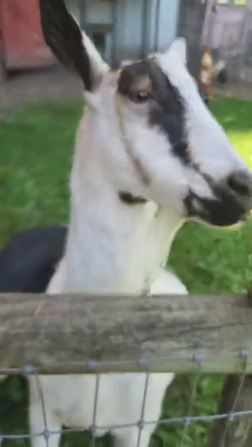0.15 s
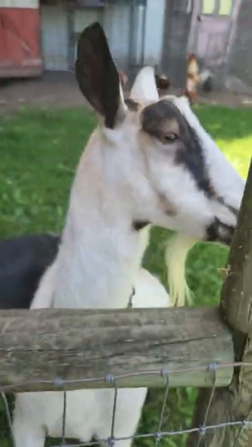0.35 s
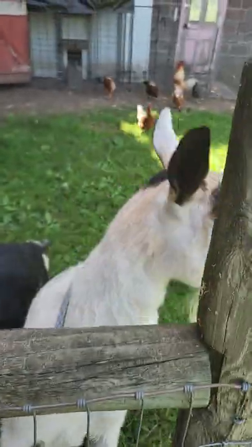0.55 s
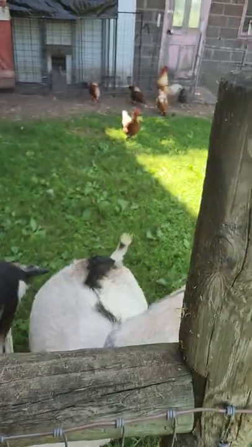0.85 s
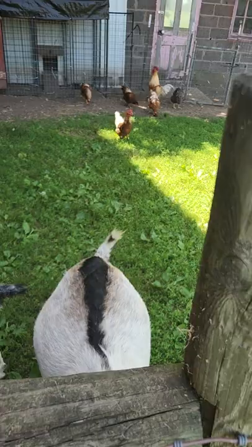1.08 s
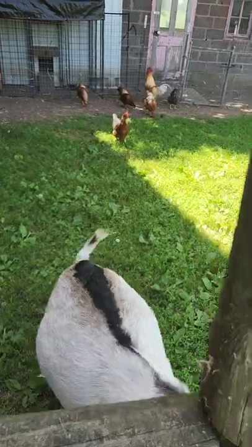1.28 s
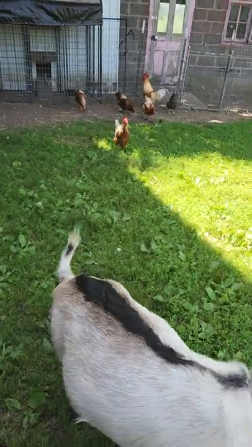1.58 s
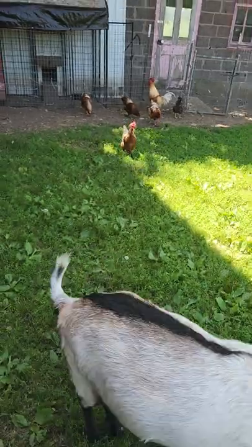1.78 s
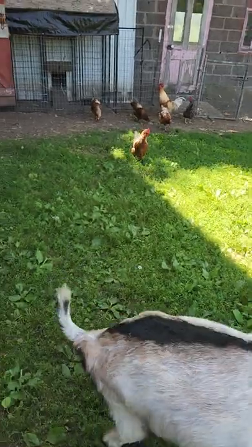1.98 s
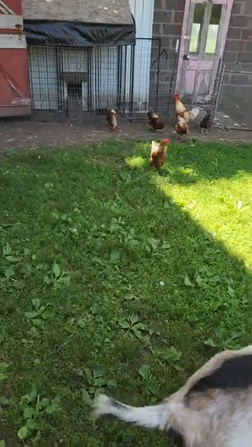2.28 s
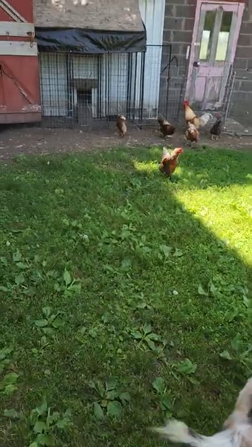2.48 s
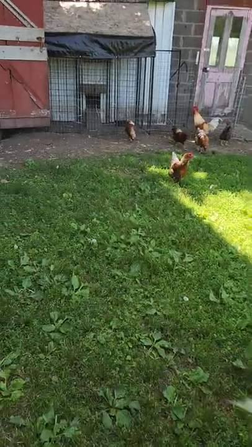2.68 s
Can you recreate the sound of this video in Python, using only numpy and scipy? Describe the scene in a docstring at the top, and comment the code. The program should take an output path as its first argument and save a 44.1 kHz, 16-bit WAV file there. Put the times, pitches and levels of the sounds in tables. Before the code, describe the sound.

Single loud rooster crow, two raspy bursts leading into a drawn-out clear note that slides down and ends low and hoarse; stereo handheld pickup outdoors near barn walls, quiet hiss and low rumble beneath.

```python
"""A rooster crows once across a grassy farmyard: two hoarse syllables, a long clear note that sags in pitch,
and a low closing note that turns hoarse again. Clear notes are sums of sines; hoarseness is uneven flaps
and turbulence ringing through throat resonances, with throbbing tones inside. Barn walls echo the hoarse voice,
and the clear partials waver. Far rumble and outdoor hiss, both of banded noise, lie below; two faint, very short
treble clicks are heard. The right microphone port is lifted near 5 kHz and dull around 7 to 9 kHz."""
import sys
import numpy as np
from scipy import signal
from scipy.fft import rfft, irfft, next_fast_len
from scipy.io import wavfile
from scipy.ndimage import uniform_filter1d

SR = 44100
rng = np.random.default_rng(int(sys.argv[2]) if len(sys.argv) > 2 else 0)


def log_audio(samples):
    """Write samples as a 16-bit WAV file to the path given in sys.argv[1]."""
    # one column per channel
    frames = np.atleast_2d(samples).T
    # limit to full scale, then quantise
    limited = np.clip(frames, -1, 1)
    pcm = np.round(limited * 32767).astype(np.int16)
    wavfile.write(sys.argv[1], SR, pcm)


N = 125685

# All source levels stand ahead of the right port's colour in record().
LEFT_LEAD_S = 0.00019   # sound reaches the left port first
LEFT_RIGHT = np.array([[1], [-1]])


def from_db(db):
    """Decibels to gain."""
    return 10 ** (np.asarray(db) / 20)


def rms_one(x):
    """Scale to unit rms."""
    return x / np.sqrt(np.mean(x ** 2) + 1e-20)


def in_time(rows):
    """Columns of a table as per-sample curves."""
    s, *columns = np.transpose(rows)
    return [np.interp(np.arange(N) / SR, s, c) for c in columns]


def at_hz(points, hz):
    """Read a spectrum table on a log frequency axis."""
    table_hz, values = np.array(points).T
    return np.interp(np.log(hz + 1), np.log(table_hz), values)


def gate(start, end, fade):
    """One between start and end, with smooth edges centred on them."""
    t = np.arange(N) / SR
    inside = np.minimum(t - start + fade / 2, end + fade / 2 - t)
    return np.sin(np.pi / 2 * np.clip(inside / fade, 0, 1)) ** 2


def drift(rate):
    """Slow random curve of spread 1: noise smoothed by two poles at rate in Hz, one point per 40 samples."""
    r = np.exp(-80 * np.pi * rate / SR)
    noise = rng.standard_normal(N // 40 + 2002)
    slow = signal.lfilter([1], [1, -2 * r, r * r], noise)[2000:]   # drop the filter's run-in
    return np.interp(np.arange(N) / 40, np.arange(len(slow)), rms_one(slow - slow.mean()))


def clear_note(rows, partials):
    """Sines on one gliding pitch: two strong partials throughout, weaker ones that come and go."""
    waver_db, waver_hz, partial_fade_s = 3.5, 22, 0.0085
    hz, one_left, one_right, two_left, two_right, lead = in_time(rows)
    phase = 2 * np.pi * np.cumsum(hz) / SR
    first = from_db([one_left, one_right]) * np.sin(phase)
    second = from_db([two_left, two_right]) * np.sin(2 * phase + [lead, 0 * lead])
    out = (first + second) * gate(rows[0][0], rows[-1][0], 0.027)

    ports = np.array([phase, phase - 2 * np.pi * hz * LEFT_LEAD_S])
    for multiple, start, end, left_db, right_db in partials:
        waver = waver_db * np.array([drift(waver_hz), drift(waver_hz)])
        level = from_db([[left_db], [right_db]] + waver) * gate(start, end, partial_fade_s)
        out = out + level * np.sin(multiple * ports)
    return np.sqrt(2) * out   # makes the table levels rms


def clear_notes():
    """The membranes swing regularly: a long note sagging in pitch, then a low closing note."""
    # Pitch and strong partials; echoes make each partial waver on its own at each port.
    # Each row: time in seconds, pitch in Hz, first partial left and right in dB,
    # second partial left and right in dB, second partial's phase lead on the left in radians.
    long_note = [(1.195, 756.4, -57, -44, -10.5, -24, -1.5), (1.215, 741.8, -33, -51, -13, -27, 0),
                 (1.27, 730.3, -37.5, -68, -20.5, -23, 1.45), (1.33, 728, -54, -40, -24, -20.5, 2.1),
                 (1.37, 728, -50, -43, -18, -19, 4), (1.39, 744, -39.0, -60, -12.5, -26, 0.3),
                 (1.43, 741, -35, -72, -38, -20, -1), (1.45, 728, -51, -67, -25, -30, 3.6),
                 (1.48, 729, -41, -54, -30, -26, 5.5), (1.515, 740, -38.0, -60, -36, -28.5, 5),
                 (1.545, 744, -41, -49, -24, -16.5, 2.5), (1.58, 738, -36, -41, -30, -18, 2.5),
                 (1.61, 729.6, -40, -63, -15.5, -27.5, 6.5), (1.65, 728.3, -39, -62, -15.5, -17, 5),
                 (1.68, 734.3, -38, -64, -23, -23, 7.5), (1.71, 722.4, -41, -52, -12, -16, 6.5),
                 (1.76, 714.7, -55, -42, -11.5, -19, 7.0), (1.88, 710.6, -41, -35.5, -8, -16.5, 8.5),
                 (1.95, 703.7, -43.0, -37, -11, -13.5, 8.5), (2.0, 698.3, -41, -38.5, -13, -19, 8.5),
                 (2.055, 693.4, -44.0, -41.5, -15, -16.5, 9.5), (2.21, 682, -42, -41, -18.5, -20.5, 10),
                 (2.255, 680.5, -36, -39, -24, -30, 8), (2.3, 674.3, -42, -38, -23, -49, 9.5),
                 (2.334, 672, -41, -42, -22, -39, 9.5)]
    last_note = [(2.337, 587.6, -37, -34, -27, -31, 0.2), (2.373, 582.7, -44, -41, -25, -32, 1.6),
                 (2.485, 566.6, -26.5, -27.5, -41.5, -56, 0.5), (2.547, 563, -31.5, -30.5, -51, -56, 2),
                 (2.57, 533.7, -28.0, -26.5, -46.0, -49, -9), (2.59, 523, -26, -29, -52, -47, -9),
                 (2.608, 509, -44, -40.5, -45, -44, -10), (2.628, 533, -40, -33, -55, -73.0, -10)]
    # Weaker partials, at halves or thirds where the voice splits.
    # Each row: multiple of the pitch, start and end in seconds, left and right level in dB.
    long_partials = [(1.5, 1.22, 1.3, -33.5, -41), (1.5, 1.3, 1.72, -46, -50),
                     (1.5, 1.85, 2.29, -41.5, -50.5), (2.5, 1.22, 1.33, -45, -47),
                     (2.5, 1.95, 2.15, -47, -49), (3.0, 1.6, 1.754, -52, -46), (5.0, 1.2, 1.255, -41, -42),
                     (5.0, 1.3, 1.58, -49, -47), (6.0, 1.59, 1.88, -52, -54), (6.5, 1.885, 1.95, -50, -50),
                     (7.0, 1.79, 1.89, -51, -43), (7.0, 1.935, 2.12, -51, -43), (7.0, 2.13, 2.25, -58, -54),
                     (7.5, 1.84, 2.22, -51, -49), (8.0, 1.84, 2.18, -48, -58), (10.0, 1.2, 1.36, -46, -51),
                     (10.0, 1.48, 1.68, -44, -58), (10.5, 1.95, 2.06, -46, -55),
                     (11.0, 1.74, 1.81, -47, -52), (1.33, 2.22, 2.33, -43, -45),
                     (1.67, 2.21, 2.3, -43, -42), (2.33, 2.215, 2.325, -40, -35),
                     (2.67, 2.26, 2.33, -43, -42)]
    last_partials = [(3.03, 2.34, 2.4, -38, -33), (3.0, 2.4, 2.52, -37, -44), (8.0, 2.34, 2.46, -52, -51.5),
                     (9.0, 2.385, 2.54, -53, -44), (10.0, 2.44, 2.53, -48, -52),
                     (2.5, 2.495, 2.52, -35, -37), (2.45, 2.55, 2.585, -31, -29)]
    return clear_note(long_note, long_partials) + clear_note(last_note, last_partials)


def throb(depth):
    """The voice swells some forty times a second, unevenly."""
    swells_per_s, spread = 36, 0.2555
    turns = np.cumsum(swells_per_s * (1 + spread * drift(9.7))) / SR
    return 1 + np.clip(depth, 0, 1) * np.sin(2 * np.pi * turns)


def flaps_and_turbulence():
    """Membranes slap at a jittery rate with uneven force, every second slap weaker; turbulence joins in."""
    flap_hz, jitter, unevenness, weak_flap = 281.8, .06, 0.31, .3   # mean rate; the rest as shares
    turbulence = .45   # rms against flaps of rms 1
    turns = np.cumsum(flap_hz * (1 + jitter * drift(90))) / SR
    count = np.floor(turns)
    flaps = np.diff(count, prepend=0) * (1 + unevenness * rng.standard_normal(N))
    flaps = flaps * (1 - weak_flap * (count % 2))
    return (rms_one(flaps) + turbulence * rng.standard_normal(N)) * throb(0.18)


def wander(x, depth, rate):
    """Read at a slowly drifting speed, so that the pitch drifts; depth is a share of the speed."""
    return np.interp(np.arange(N) + np.cumsum(depth * drift(rate)), np.arange(N), x)


def resonate(x, hz, width):
    """Twice through a two-pole resonance, gain 1 on top."""
    r = np.exp(-np.pi * np.sqrt(2) * width / SR)
    section = [(1 - r * r) / 2, 0, (r * r - 1) / 2, 1, -2 * r * np.cos(2 * np.pi * hz / SR), r * r]
    return signal.sosfilt([section, section], x)


def rasp(loudness, throat):
    """Flaps and turbulence excite throat and beak resonances; returns direct sound and echo feed."""
    waver_db, wander_depth, wander_hz = 2.5, .02, 7   # resonances swell, their input drifts in pitch
    beak_above_hz, beak_opens_s = 3000, .05           # treble resonances swell in after the start
    source = flaps_and_turbulence()
    start, end = loudness[0][0], loudness[-1][0]
    progress = np.clip((np.arange(N) / SR - start) / (end - start), 0, 1) - .5
    direct, wet = 0, 0
    for k, (hz, width, db, change_db, pan_db, share) in enumerate(throat):
        in_beak = hz > beak_above_hz
        ring = resonate(source if in_beak else wander(source, wander_depth, wander_hz), hz, width)
        ring_db = db + change_db * progress + waver_db * drift(wander_hz) + pan_db / 2 * LEFT_RIGHT
        ring = (-1) ** k * ring * from_db(ring_db)   # neighbours in opposite polarity
        if in_beak:
            ring = ring * gate(start + beak_opens_s / 2, end + 1, beak_opens_s)
        share = np.clip(share, 0, 1)
        direct = direct + np.sqrt(1 - share) * ring
        wet = wet + np.sqrt(share) * ring
    level = from_db(in_time(loudness)[0]) * gate(start, end, 0.0054)
    # divide by the running level, so that the loudness table sets the loudness
    power = uniform_filter1d(np.mean(direct ** 2 + wet ** 2, axis=0), SR // 16)
    return level * np.array([direct, wet]) / np.sqrt(power + 1e-12)


def hoarse_rasps():
    """Hoarse stretches of the crow, each shaped by its own loudness and the resonances of throat and beak."""
    # Loudness of each hoarse stretch. Each row: time in seconds, level in dB.
    first_rasp = [(.19, -45), (.2, -24), (.3, -20), (.415, -19.5), (.43, -29.5), (.45, -49)]
    second_rasp = [(.585, -49), (.6, -20), (.62, -18), (.68, -16), (.92, -19), (1.1, -17.5), (1.19, -22)]
    break_rasp = [(2.205, -37), (2.22, -31), (2.3, -34.5), (2.33, -25), (2.36, -44)]   # between the long and the closing note
    last_rasp = [(2.48, -46), (2.51, -28), (2.57, -29.5), (2.6, -32.5), (2.628, -40)]
    beak_rasp = [(1.19, -35), (1.4, -53), (1.85, -47.5), (2.3, -42), (2.61, -38.5), (2.64, -53)]     # treble rasp over the clear notes
    # Throat and beak resonances, balanced against each other within a table.
    # Each row: frequency in Hz, width in Hz, relative level in dB, change from start to end in dB,
    # left minus right in dB, share heard as echo from 0 to 1.
    first_throat = [(595, 50, -14.5, -21, -2, 0.94), (760, 300, -14, 2, 4.5, 0.65),
                    (1127, 68, -1.5, 9.5, 6, 0.22), (1340, 167, 1, 8.5, -8, 0.27),
                    (1650, 290, -11, 2, 22.5, 0.65), (1835, 92, -4.5, -12, -5.5, 0.7),
                    (2696, 60, -21.5, 19, -8, 0.1), (4724, 360, -10, -14, 0.5, 0.9),
                    (5000, 390, -15.5, -11, -1, 0.73), (5700, 800, -18, -12, 0, 0.87),
                    (7600, 1600, -29.5, -13, 0, 1), (11700, 1900, -36, -3, 7, .6)]
    second_throat = [(663, 82, -14.5, 4, 2, 0.67), (1094, 89, -4.5, 0, 7, 0.11),
                     (1245, 80, -3.5, -11, 0, 0.13), (1443, 110, -4.5, 7, 8, 0.85),
                     (1718, 86, -5, -10, 9.5, 1), (1853, 143, -11, 5, -8.5, 0.77),
                     (2150, 113, -13, -8, 8.5, 0.89), (2660, 225, -19, 1, 3, 0.39),
                     (3650, 370, -18.5, -2, -0.5, 0.38), (6020, 1540, -31.5, -3, 2.5, 0.99),
                     (7330, 450, -19.5, 0.5, 0.5, 1), (8300, 690, -26, -5.5, -4.5, 0.98),
                     (11740, 1340, -34, -1.5, 1.5, 0.97)]
    late_throat = [(600, 144, -6, 12, 4, 0.93), (897, 170, -18, 2, 5, 0.42), (1183, 85, -8, 19, 6, 0.37),
                   (1340, 110, 2.5, 0, 4, 0.41), (1546, 90, -3, -13, 8, 0.44),
                   (2680, 160, -9.5, 6, 4, 0.39), (5060, 380, -17, -2, 4, 0.33)]
    open_beak = [(5000, 800, 0.5, 10, 0, 0.93), (5750, 350, -2, 5, 0, 1), (7430, 900, 3, -6, 0, 0.68)]
    return (rasp(first_rasp, first_throat) + rasp(second_rasp, second_throat)
            + rasp(break_rasp, late_throat) + rasp(last_rasp, late_throat) + rasp(beak_rasp, open_beak))


def rough_voice(rows, first_throb=0.9):
    """Two partials on a trembling pitch, throbbing; returns direct sound and echo feed."""
    pitch_jitter, second_throb, echo_share = .012, 0.9, 0.16
    second_pan_db = -7   # left minus right
    hz, one_db, two_db = in_time(rows)
    phase = 2 * np.pi * np.cumsum(hz * (1 + pitch_jitter * drift(37.3))) / SR
    first = from_db(one_db) * np.sin(phase) * throb(first_throb)
    second = from_db(two_db) * np.sin(2 * phase) * throb(second_throb)
    tone = first + from_db(second_pan_db / 2 * LEFT_RIGHT) * second
    split = np.sqrt([[[2 - 2 * echo_share]], [[2 * echo_share]]])
    return split * tone * gate(rows[0][0], rows[-1][0], 0.011)


def rough_voices():
    """Pitched, throbbing voices inside the hoarse syllables."""
    # Each row: time in seconds, pitch in Hz, first and second partial in dB before throb and panning.
    early_voice = [(.195, 985, -59, -26), (.22, 950, -53, -38), (.33, 920, -59, -47), (.43, 910, -55, -33)]   # first syllable
    low_voice = [(.615, 830, -39, -43), (.655, 850, -30, -24), (.86, 848, -32, -26.5), (.94, 800, -42, -37),
                 (1.05, 855, -32, -26.5), (1.11, 825, -32, -32), (1.205, 757, -36, -45)]       # second syllable, with the high voice
    high_voice = [(.59, 1125, -36, -62), (.615, 1114, -30.5, -40), (.88, 1111, -28.5, -42),
                  (.94, 1091, -23, -54), (1.02, 1101, -30, -44), (1.12, 1107, -26, -40.5),
                  (1.2, 1090, -40.5, -37)]
    return rough_voice(low_voice, first_throb=.5) + rough_voice(high_voice) + rough_voice(early_voice)


def yard(direct, wet):
    """Direct sound reaches the left port first; walls return a short, different scatter to each port."""
    t60_s, first_echo_s = 0.15, .004
    t = np.arange(int(.3 * SR)) / SR
    scatter = rng.standard_normal((2, len(t))) * from_db(-60 * t / t60_s) * (t > first_echo_s)
    scatter = scatter / np.sqrt(np.sum(scatter ** 2, axis=1, keepdims=True))
    late = np.interp(np.arange(N) - LEFT_LEAD_S * SR, np.arange(N), direct[1])
    echo = signal.fftconvolve(wet, scatter, axes=1)[:, :N]
    return np.array([direct[0], late]) + echo


def treble_clicks():
    """Faint short clicks, each ringing briefly in the treble."""
    # Each row: time in seconds, peak level in dB.
    click_rows = [(1.2146, -36), (2.4259, -34)]
    clicks = np.full(N, 1e-18)
    for s, db in click_rows:
        clicks[int(s * SR)] = from_db(db)
    ring = resonate(clicks, 11900, 1500)   # centre and width in Hz
    return ring * clicks.max() / np.abs(ring).max()


def banded_noise(spectrum, patchy_db):
    """Half-octave bands of stereo noise, each with its own level, flicker and left-right likeness; rms 1."""
    # Each row: frequency in Hz, likeness of left and right from 0 (unrelated) to 1 (same).
    likeness = [(60, 0.92), (130, 0.95), (290, 0.94), (640, 0.043), (1400, 0.01)]
    edges = 16 * 2 ** np.arange(0, 10.1, .5)
    white = rng.standard_normal((2, 2, N + SR // 4))   # neighbouring bands take different noise
    out = 0
    for k, (low, high) in enumerate(zip(edges, edges[1:])):
        hz = np.sqrt(low * high)
        if not spectrum[0][0] < hz < spectrum[-1][0]:
            continue
        band = signal.butter(2, [low, high], "band", fs=SR, output="sos")
        mid, side = signal.sosfilt(band, white[k % 2])[:, -N:]
        alike = np.clip(at_hz(likeness, hz), -1, 1)
        gain = from_db(at_hz(spectrum, hz) + patchy_db * drift(11))
        out = out + gain * (np.sqrt(1 + alike) * mid + np.sqrt(1 - alike) * side * LEFT_RIGHT)
    return rms_one(out)


def outdoor_hiss():
    """Broad outdoor noise, its level moving slowly."""
    # Spectrum. Each row: frequency in Hz, relative level in dB per Hz.
    hiss = [(88, -21), (150, -1.5), (562, -7.5), (1050, -9), (1950, -8.5), (5460, -8), (6900, -12),
            (11900, -14.5), (15600, -34.5)]
    # Loudness. Each row: time in seconds, level in dB.
    hiss_level = [(0, -41.5), (.6, -40.5), (1.4, -39), (2.1, -37.5), (2.85, -37.5)]
    return from_db(in_time(hiss_level)[0]) * banded_noise(hiss, patchy_db=1.0)


def far_rumble():
    """Low noise from afar that swells and sinks."""
    # Spectrum. Each row: frequency in Hz, relative level in dB per Hz.
    rumble = [(11, -34), (18, -1), (65, 9), (157, -8.5), (219, -22), (250, -9), (320, -47), (550, -120)]
    # Loudness. Each row: time in seconds, level in dB.
    rumble_level = [(0, -42), (.15, -49.5), (1.1, -45.5), (1.62, -41), (1.95, -50.5), (2.11, -34.5),
                    (2.2, -39), (2.54, -46), (2.6, -32.5), (2.67, -49), (2.85, -41.5)]
    return from_db(in_time(rumble_level)[0]) * banded_noise(rumble, patchy_db=2.0)


def scene():
    """Hoarse and clear voice over the yard's floor of noise."""
    hoarse_direct, hoarse_wet = hoarse_rasps() + rough_voices()
    crow = yard(hoarse_direct, hoarse_wet) + clear_notes()
    return crow + treble_clicks() + outdoor_hiss() + far_rumble()


def record(dry):
    """The right port adds its colour; peaks are rounded, the top is cut."""
    # Right port's response. Each row: frequency in Hz, level over the left port in dB.
    right_port = [(100, 0), (2000, 5), (3500, 3), (5000, 8.5), (6000, 4.5), (7000, -11.5), (9000, -16.5),
                  (11500, 1), (15000, 2)]
    size = next_fast_len(N + 4096)
    colour = from_db(at_hz(right_port, np.arange(size // 2 + 1) * SR / size))
    right = irfft(rfft(dry[1], size) * colour, size)[:N]
    rounded = 2 * np.tanh(np.array([dry[0], right]) / 2)
    top_cut = signal.cheby2(24, 70, 15780, fs=SR, output="sos")   # 70 dB down from 15780 Hz
    return signal.sosfilt(top_cut, rounded)


dry = scene()
out = record(dry)
log_audio(out)
```